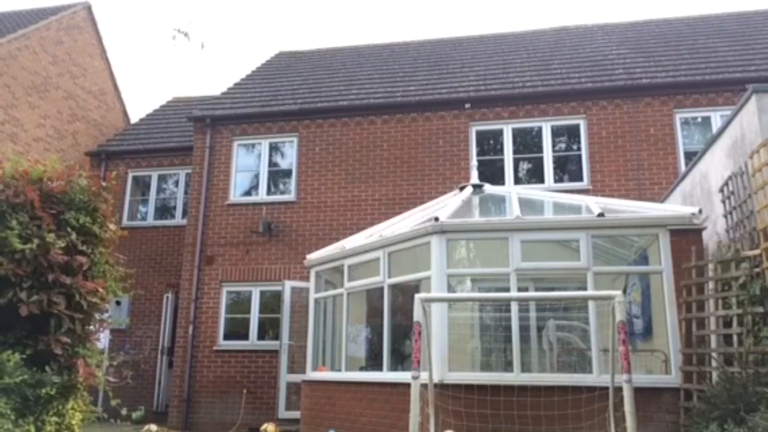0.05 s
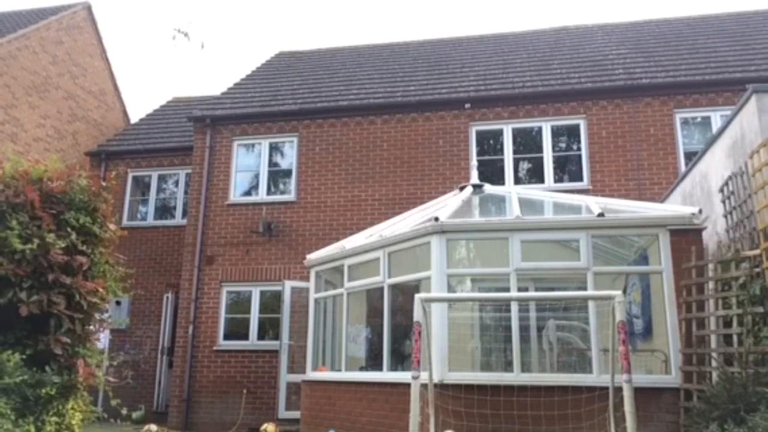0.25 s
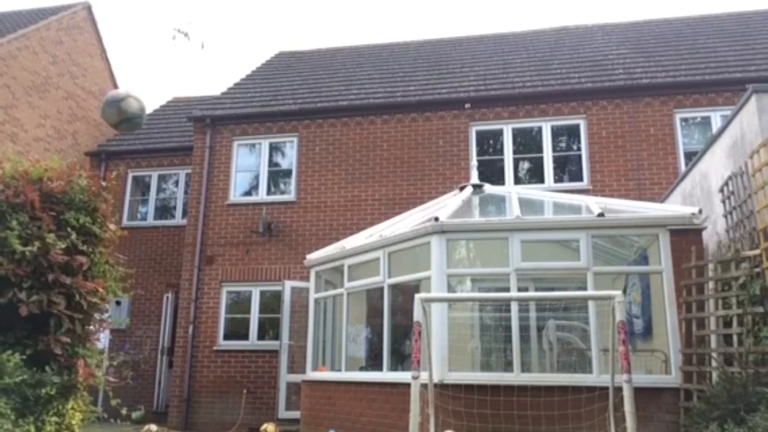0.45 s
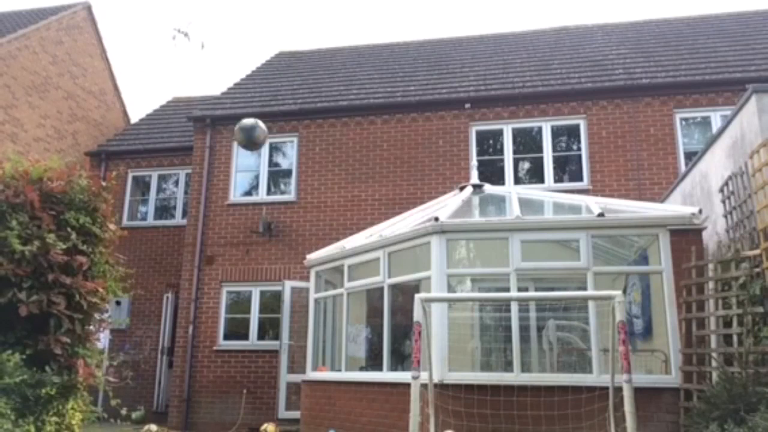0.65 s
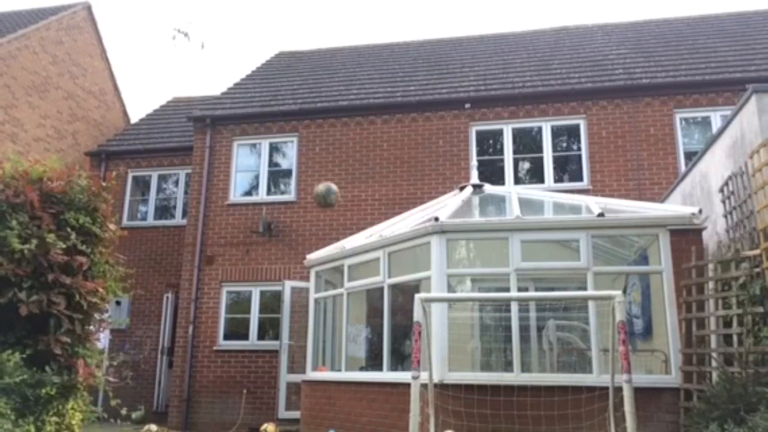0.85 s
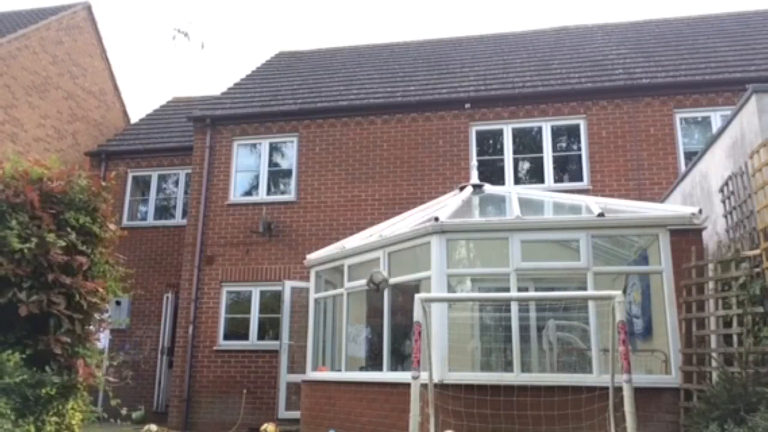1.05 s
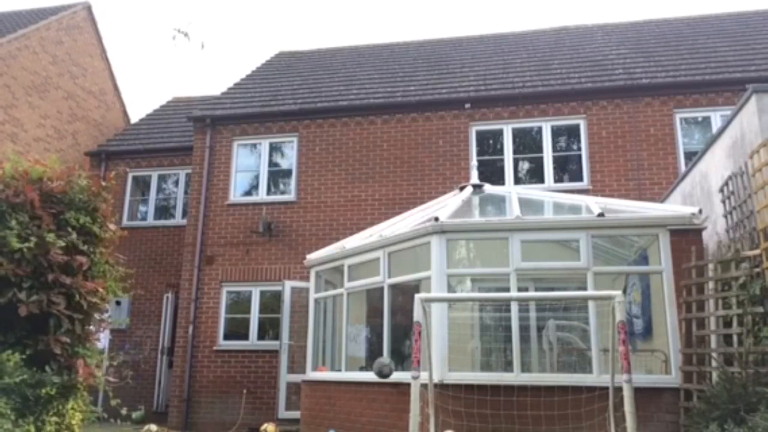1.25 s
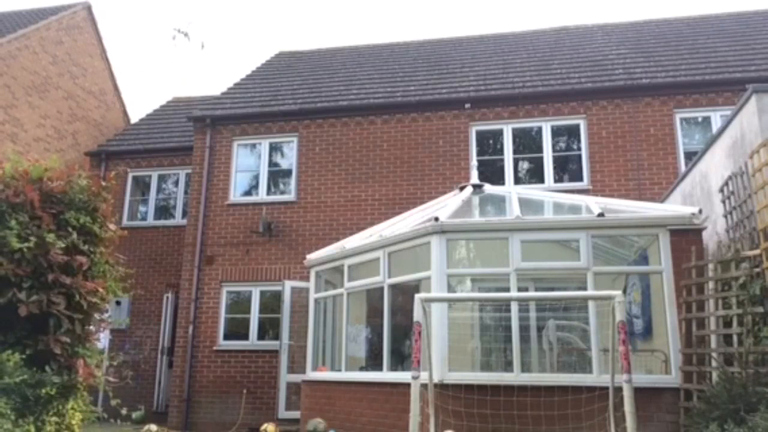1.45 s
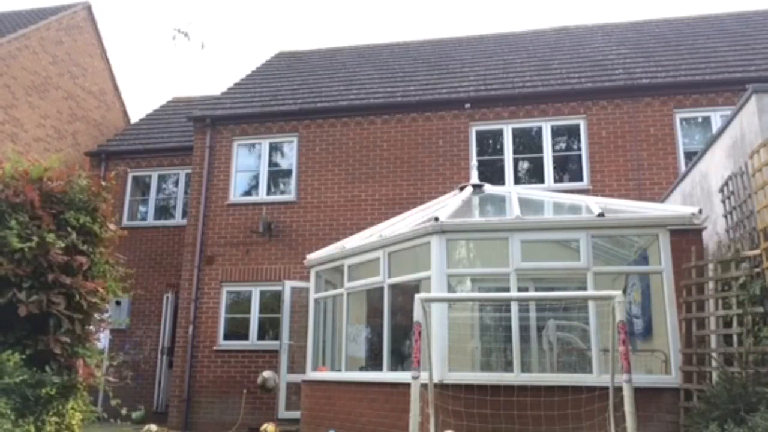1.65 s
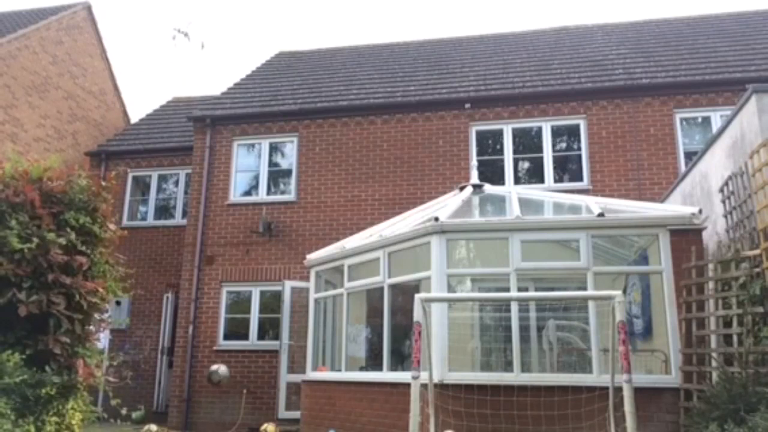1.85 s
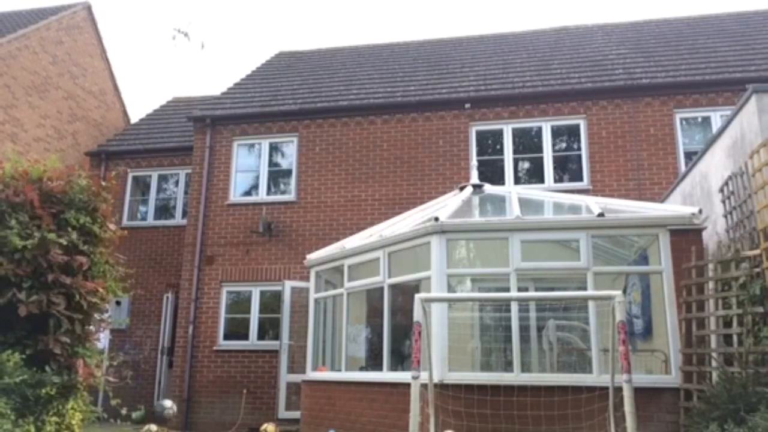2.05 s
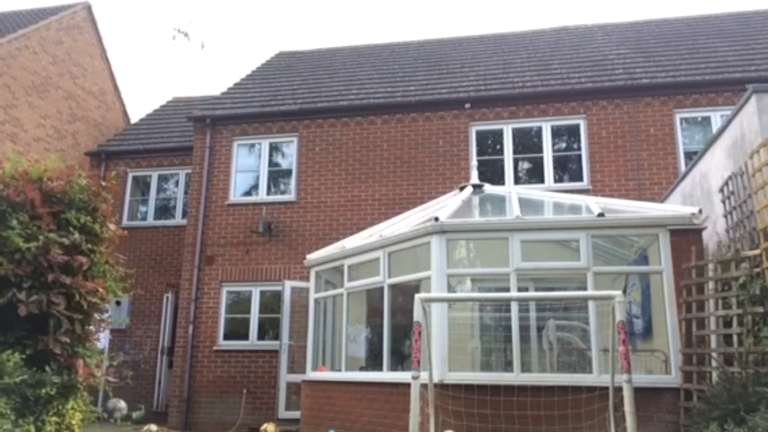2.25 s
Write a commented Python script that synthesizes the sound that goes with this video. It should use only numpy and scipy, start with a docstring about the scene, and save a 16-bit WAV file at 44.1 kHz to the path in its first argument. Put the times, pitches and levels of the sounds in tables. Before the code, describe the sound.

A football is kicked hard and close at about 0.2 seconds, a thump and slap with a short hollow ring and a quick echo off the house. At 1.3 seconds it hits a small goal: the net snaps and swishes and the frame shudders. The ball bounces on the lawn at 1.55 seconds and more softly at 2.25. Faint chirps, grass scuffs and low outdoor rumble lie underneath.

```python
"""A hard, close football kick, a swish and shudder as the ball lands on a small goal, two lawn bounces.
Each blow is a low thump, a slap of the skin and a ring of the air inside; fence and house throw it back.
The net snaps taut, swishes and tugs its frame into ringing.
Shoes brush the grass; faint chirps and soft rustles sit over a low outdoor rumble."""
import sys
import numpy as np
from scipy import signal
from scipy.fft import rfft, irfft
from scipy.io import wavfile

SR = 44100
rng = np.random.default_rng(int(sys.argv[2]) if len(sys.argv) > 2 else 0)


def wav_out(sig):
    """Save sig, one row per channel (or a flat mono array), as 16-bit PCM at SR to the path in sys.argv[1]."""
    wavfile.write(sys.argv[1], SR, np.round(np.clip(np.atleast_2d(sig).T, -1, 1) * 32767).astype(np.int16))


N = 101429

# modes of the ball's shell and air: f/Hz, level/dB, t60/s
BALL_MODES = [(170, 10, 0.091), (231.9, 9.5, 0.11), (292.4, -4, 0.244), (426, -3.5, 0.28), (504, -13, 0.49),
              (534, -5, 0.12), (611, -4.5, 0.068), (652, 3, 0.28), (769, 0, 0.19), (1040, -7.5, 0.1),
              (1159, -8.5, 0.25), (1216, -9.5, 0.064), (1445, -17.5, 0.12), (1815, -14, .11)]
GOAL_HIT_S = 1.3163


def kick():
    """Boot on ball: thump, slap, skin crease and ring, echoed by fence, house and far wall."""
    slap_spectrum = [(100, -16), (400, -7), (800, 0.5), (1400, -2), (2100, 1), (2600, -6), (3050, -23),
                     (4200, -30), (7500, -24.5), (11000, -26), (16000, -41.5)]  # boot on skin: f/Hz, level/dB
    crease_spectrum = [(200, 12.5), (700, 3), (2000, -17.5), (3200, -18), (5500, -20), (6700, -14.5),
                       (7600, -6.5), (8600, -15), (10000, -10), (13000, -16), (16000, -29.5)]  # skin creasing: f/Hz, level/dB
    reflections = [(0.0159, -11, 2300), (0.0554, -19.5, 393), (.122, -30.5, 250)]  # fence, house, far wall: delay/s, level/dB, low-pass/Hz
    start_s = 0.2302
    low = thump(start_s - 0.0038, hz=95.9, attack_s=0.005, hold_s=0.015, t60_s=0.031)
    slap = click(start_s, slap_spectrum)
    slap += undb(-5.5) * click(start_s + 0.00065, slap_spectrum)  # bounced back by the air inside
    direct = undb(-1.5) * low - undb(-8.5) * slap + undb(-29.5) * ring(start_s, BALL_MODES)
    direct += undb(-22) * noise(crease_spectrum) * envelope(start_s - 0.0008, 0.0015, 0, 0.044)
    echoes = sum(undb(db) * delay(lowpass(direct, hz), lag_s) for lag_s, db, hz in reflections)
    return direct + echoes + undb(-22) * scatter(start_s, low_t60_s=0.24)


def goal_net():
    """The net snaps taut; the sliding ball makes the mesh swish and the cords sing; a clip ticks."""
    snap_events = [(1.3163, -23.5), (1.3232, -38), (1.348, -43), (1.362, -40)]  # strike, then net snaps: t/s, level/dB
    snap_spectrum = [(150, -18), (900, 6), (2000, -6), (3300, -3), (4600, -25.5), (7500, -9),
                     (10000, -27.5), (16000, -34)]  # net snapping: f/Hz, level/dB
    swish_spectrum = [(120, 9), (300, 6.5), (600, 2.5), (900, -1.5), (1700, -0.5), (2400, -12), (3200, -7),
                      (4100, -13.5), (4900, -11.5), (6600, -15), (8500, -21), (11000, -34.5),
                      (16000, -47.5)]  # ball on mesh: f/Hz, level/dB
    cord_spectrum = [(2500, -45), (4400, -12), (4900, 0), (5400, -20), (6500, -3.5), (7200, -22),
                     (12000, -50)]  # singing cords: f/Hz, level/dB
    snaps = noise(snap_spectrum)
    snaps *= sum(undb(db) * envelope(s, 0.00033, 0, 0.017) for s, db in snap_events)
    swish = noise(swish_spectrum) * undb(1.4 * wander(220)) * envelope(GOAL_HIT_S, 0.006, 0.07, 0.45)
    tick_hz = 5840
    tick_band = [(tick_hz * 0.7, -30), (tick_hz * 0.85, 0), (tick_hz * 1.15, 0), (tick_hz * 1.35, -30)]
    tick = noise(tick_band) * envelope(1.346, 0.001, 0, 0.023)
    cords = noise(cord_spectrum) * envelope(GOAL_HIT_S, 0.052, 0, 0.62)
    return snaps + undb(-37.5) * swish + undb(-40) * tick + undb(-54) * cords


def goal_frame():
    """The frame rings from the hit and thumps at each tug of the net."""
    tug_events = [(1.3126, 85, -21), (1.3335, 71.6, -22.5), (1.3555, 90, -19), (1.3768, 84.4, -22.5),
                  (1.4285, 93.3, -23.5), (1.457, 89, -28.5)]  # net pulling the frame: t/s, f/Hz, level/dB
    frame_modes = [(50.4, 4.5, 0.44), (135.3, -1.5, 0.51), (200.1, 4.5, .33), (249, -9.5, .25),
                   (335, -9, 0.35), (392, -8.5, 0.32), (446, -17.5, 0.52), (530.5, -13.5, 0.36),
                   (836, -20, 0.24), (1074, -14.5, 0.21)]  # frame resonances: f/Hz, level/dB, t60/s
    tugs = sum(undb(db) * thump(s, hz, 0.0038, 0.0078, 0.082) for s, hz, db in tug_events)
    return tugs + undb(-25.5) * ring(GOAL_HIT_S, frame_modes)


def bounces():
    """Soft landings on turf: thump, pat and ring, with a low echo from the house."""
    # ball on lawn: t/s, thump/Hz, thump/dB, pat/dB, ring/dB, echo delay/s, echo/dB
    landings = [(1.5503, 82, -20.5, -40, -58, 0.041, -24),
                (2.2565, 81.5, -38.5, -50.5, -57, 0.01804, -25.5)]
    pat_spectrum = [(100, 4), (400, 3), (850, -15), (1180, 0), (1550, -2), (1950, -5.5), (2350, -24),
                    (6000, -33.5), (15000, -45)]  # skin on turf: f/Hz, level/dB
    out = np.zeros(N)
    for s, hz, thump_db, pat_db, ring_db, lag_s, echo_db in landings:
        low = thump(s, hz, attack_s=0.0043, hold_s=0.0079, t60_s=0.048)
        pat = noise(pat_spectrum) * envelope(s + 0.0012, 0.004, 0.0024, 0.059)
        pat += undb(-0.5) * lowpass(scatter(s, low_t60_s=0.35), 3000)
        out += undb(thump_db) * low + undb(echo_db) * delay(low, lag_s)
        out += undb(pat_db) * pat + undb(ring_db) * ring(s + 0.0042, BALL_MODES)
    return out


def scatter(start_s, low_t60_s):
    """Diffuse return from walls and shrubs; the lows last longer."""
    spectrum = [(60, -5.5), (150, 13.5), (300, 7), (700, 5), (1100, -11), (2000, -14.5), (3200, -24),
                (7500, -26), (11000, -36), (16000, -42.5)]  # garden scatter: f/Hz, level/dB
    split_hz, attack_s, high_t60_s = 750, 0.0065, 0.21
    wash = noise(spectrum)
    low = signal.sosfiltfilt(signal.butter(2, split_hz, fs=SR, output="sos"), wash)
    low_tail = low * envelope(start_s, attack_s, 0, low_t60_s)
    return low_tail + (wash - low) * envelope(start_s, attack_s, 0, high_t60_s)


def scuffs():
    """Shoes and ball brush the grass: an uneven scrape and a hiss of blades."""
    brushes = [(.662, -67, -75), (.975, -73.5, -74), (1.905, -71.5, -71), (1.992, -63, -62),
               (2.259, -63.5, -66.5)]  # grass contacts: t/s, scrape/dB, hiss/dB
    scrape_spectrum = [(300, 0), (1500, 2), (2700, 1.5), (4000, -15), (16000, -42)]  # scrape on turf: f/Hz, level/dB
    hiss_spectrum = [(2000, -26), (7000, 2), (9500, 1.5), (12500, -2), (16000, -3)]  # grass blades: f/Hz, level/dB
    scrape, hiss = noise(scrape_spectrum), noise(hiss_spectrum)
    out = np.zeros(N)
    for s, scrape_db, hiss_db in brushes:
        out += (undb(scrape_db) * scrape + undb(hiss_db) * hiss) * envelope(s, 0.006, 0.016, 0.26)
    return out * undb(2 * wander(170))


def rustles():
    """Soft swells of low noise."""
    swells = [(1.2, -54.5, 0.1, 0.78), (2.08, -59.5, 0.019, 0.57)]  # rustles: t/s, level/dB, attack/s, t60/s
    spectrum = [(100, -17), (300, 4), (700, 2), (1200, -12.5), (2500, -18.5), (8000, -53)]  # dull rustle: f/Hz, level/dB
    level = sum(undb(db) * envelope(s, attack_s, 0, t60_s) for s, db, attack_s, t60_s in swells)
    return noise(spectrum) * level


def chirps():
    """Faint distant chirps: short bursts of narrow-band noise."""
    calls = [(0.383, 0.041, 3600, -71.5), (0.523, .03, 3500, -75), (1.809, 0.054, 3750, -70.5)]  # chirps: t/s, hold/s, f/Hz, level/dB
    out = np.zeros(N)
    for s, hold_s, hz, db in calls:
        band = [(hz / 2, -50), (hz * 0.8, -16), (hz, 0), (hz * 1.25, -16), (hz * 2, -50)]
        out += undb(db) * noise(band) * envelope(s, 0.023, hold_s, 0.34)
    return out


def rumble():
    """Low outdoor noise, drifting slightly in level."""
    spectrum = [(20, -29), (30, -23), (42, -8), (60, -2), (87, 1), (108, -0.5), (128, -12.5), (165, -9.5),
                (230, -17), (310, -21.5), (410, -23.5), (600, -33), (887, -41.5), (1300, -41),
                (2200, -45.5), (4000, -46.5), (10700, -53.5), (16000, -62.5)]  # outdoor air: f/Hz, level/dB
    drift = [(0, 0.5), (.2, 0.5), (.5, -1.5), (.9, -1), (1.15, -1), (1.28, 1), (1.7, 1), (1.95, -1),
             (2.12, 0), (2.3, 0.5)]  # rumble drift: t/s, level/dB
    drift_db = np.interp(since(0), *np.array(drift).T)
    return undb(-44 + drift_db) * noise(spectrum)


def thump(start_s, hz, attack_s, hold_s, t60_s):
    """A few low swings of air from a soft impact."""
    return -np.sin(2 * np.pi * hz * since(start_s)) * envelope(start_s, attack_s, hold_s, t60_s)


def ring(start_s, modes):
    """Damped modes set off together, each slightly out of tune."""
    t = since(start_s)
    out = np.zeros(N)
    for hz, db, t60_s in modes:
        amplitude = undb(db) * rng.choice([-1, 1])
        detuned_hz = hz * (1 + 0.00197 * rng.standard_normal())
        out += amplitude * np.sin(2 * np.pi * detuned_hz * t) * np.exp(-np.log(1000) * t / t60_s)
    return out


def click(start_s, spectrum):
    """One minimum-phase pulse, peak 1."""
    cepstrum = irfft(np.log(bin_gains(spectrum)), N)
    cepstrum[1:N // 2] *= 2
    cepstrum[N // 2:] = 0
    pulse = irfft(np.exp(rfft(cepstrum)), N)
    return delay(pulse / np.abs(pulse).max(), start_s)


def noise(spectrum):
    """Coloured noise, rms 1."""
    x = irfft(rfft(rng.standard_normal(N)) * bin_gains(spectrum), N)
    return x / x.std()


def bin_gains(spectrum):
    """Gain per FFT bin from (f/Hz, level/dB) points."""
    hz, db = np.array(spectrum).T
    bin_hz = np.arange(N // 2 + 1) * SR / N
    return undb(np.interp(np.log(bin_hz + 1), np.log(hz), db))


def envelope(start_s, attack_s, hold_s, t60_s):
    """Linear attack, hold, exponential release."""
    t = since(start_s)
    release_s = np.maximum(t - attack_s - hold_s, 0)
    return np.minimum(t / attack_s, 1) * np.exp(-np.log(1000) * release_s / t60_s)


def wander(rate_hz):
    """Interpolated random values, spread near 1."""
    return np.interp(since(0) * rate_hz, np.arange(4096), rng.standard_normal(4096))


def since(start_s):
    """Seconds since the start, zero before it."""
    return np.maximum(np.arange(N) / SR - start_s, 0)


def delay(x, lag_s):
    return np.interp(np.arange(N) - np.round(lag_s * SR), np.arange(N), x, left=0)


def lowpass(x, hz):
    return signal.sosfilt(signal.butter(2, hz, fs=SR, output="sos"), x)


def undb(db):
    return 10 ** (np.asarray(db) / 20)


def scene():
    """Ball and goal over the garden background, mono."""
    football = kick() + goal_net() + goal_frame() + bounces()
    garden = rumble() + rustles() + scuffs() + chirps()
    return (football + garden)[None]


def record(dry):
    """Gentle gain control ducks the mix after loud blows; the top treble is cut."""
    threshold_db, ratio, react_s, release_s, cutoff_hz = -19, 1.23, 0.016, 0.21, 15900
    fall = since(0) / release_s
    log_level = np.log(np.abs(dry[0]) + 1e-9)
    peak = np.exp(np.maximum.accumulate(log_level + fall) - fall)  # decaying peak hold
    duck_db = np.maximum(20 * np.log10(peak) - threshold_db, 0) * (1 - 1 / ratio)
    step = 1 / (react_s * SR)
    ducked = dry * undb(-signal.lfilter([step], [1, step - 1], duck_db))
    return signal.sosfilt(signal.ellip(8, 0.2, 70, cutoff_hz, fs=SR, output="sos"), ducked)


dry = scene()
out = record(dry)
wav_out(out)
```